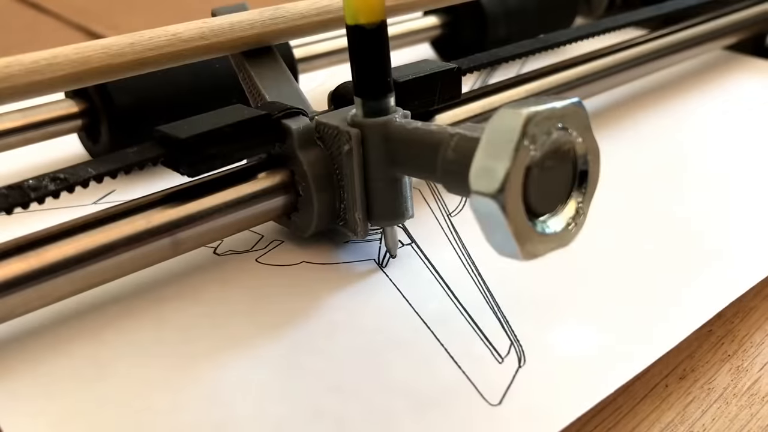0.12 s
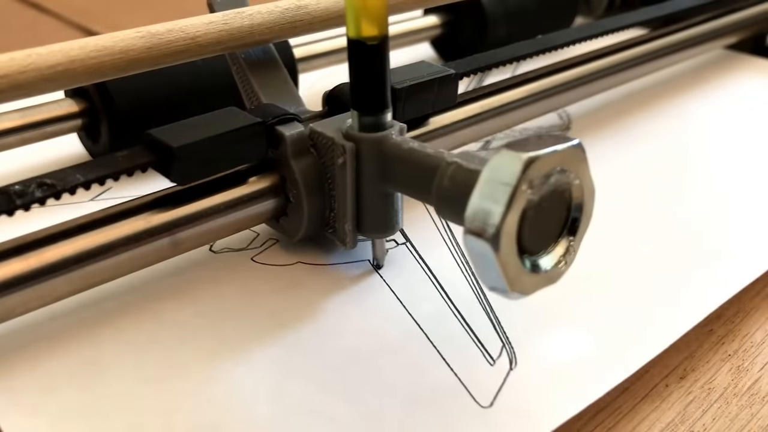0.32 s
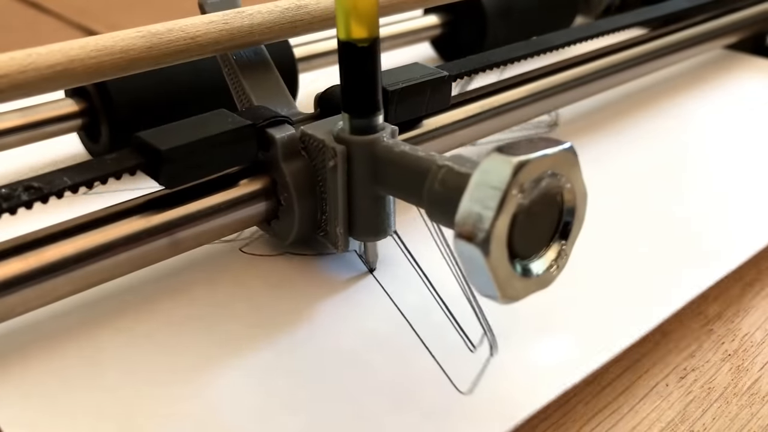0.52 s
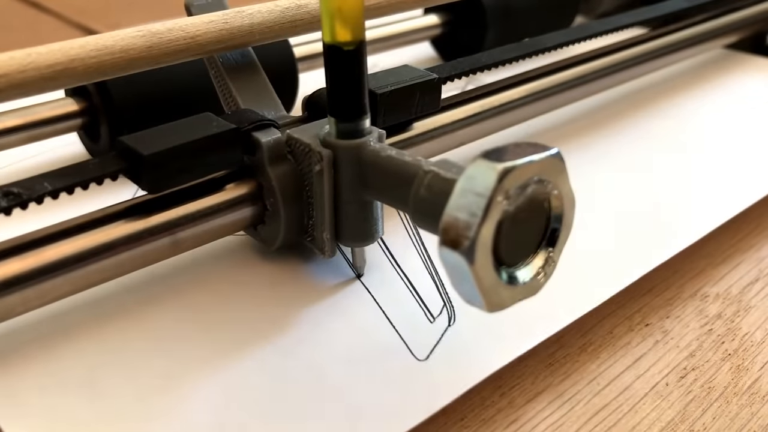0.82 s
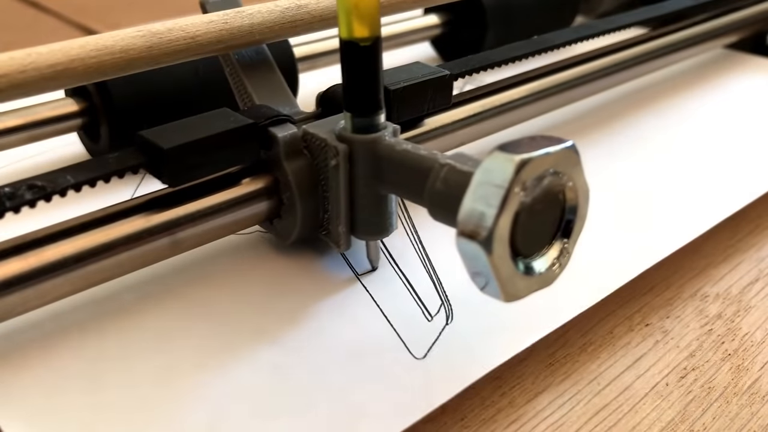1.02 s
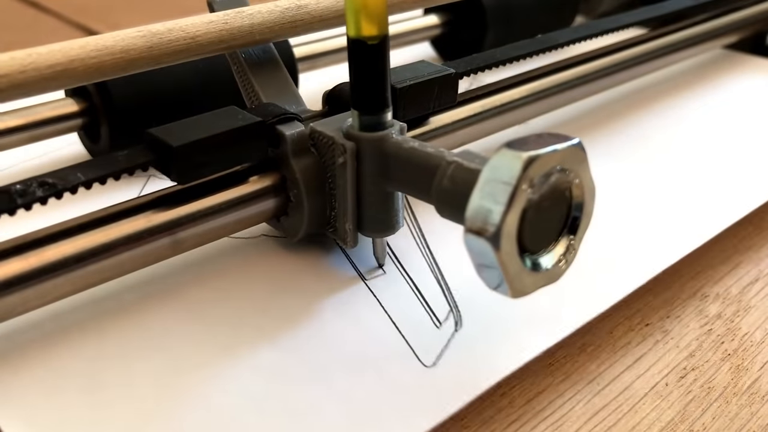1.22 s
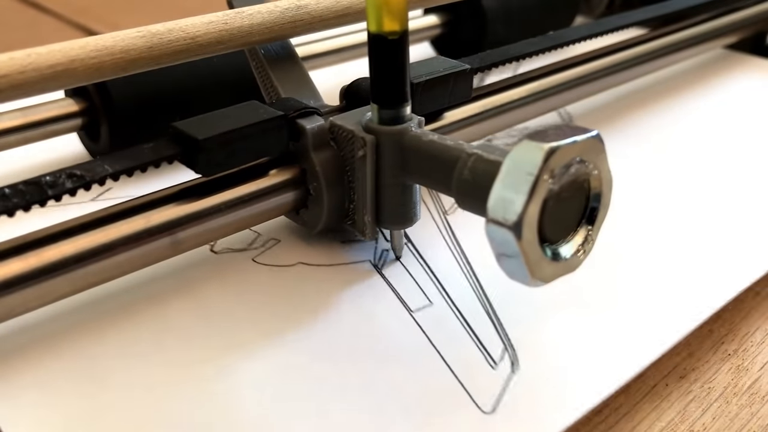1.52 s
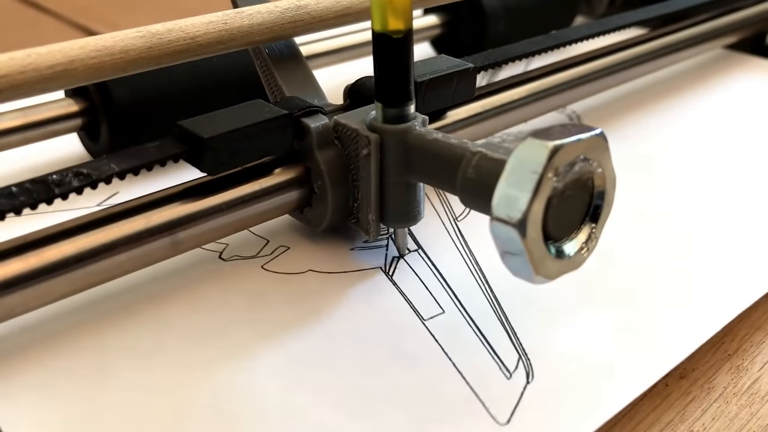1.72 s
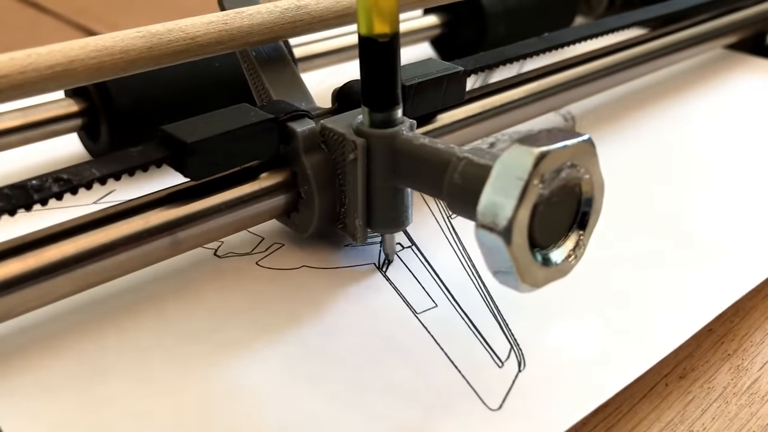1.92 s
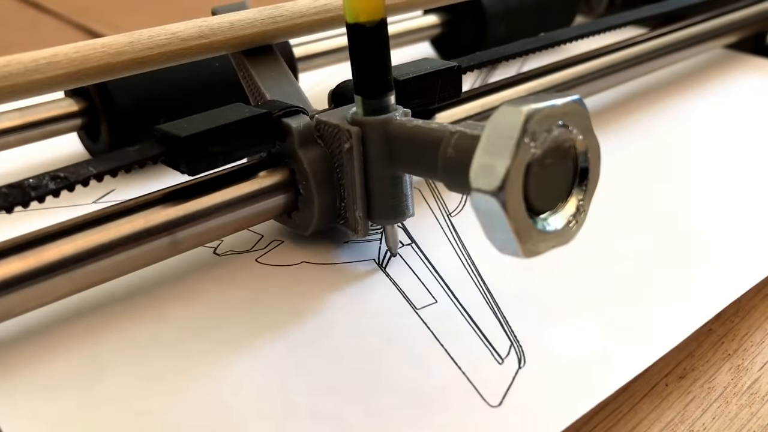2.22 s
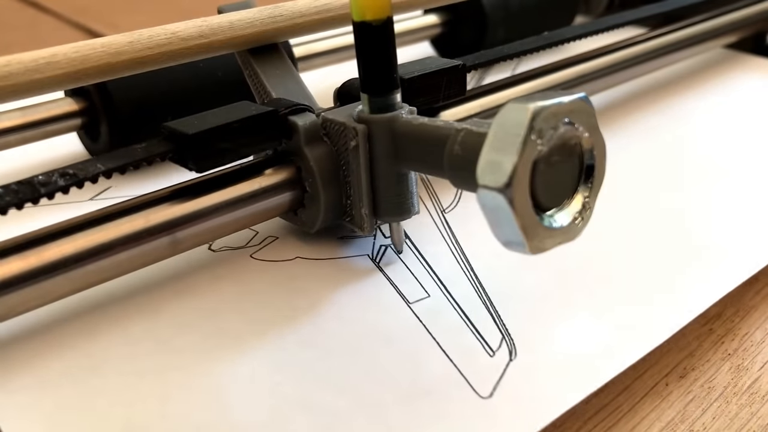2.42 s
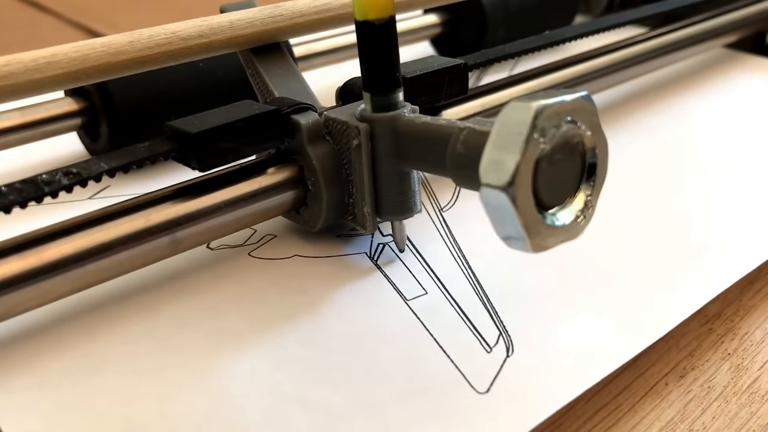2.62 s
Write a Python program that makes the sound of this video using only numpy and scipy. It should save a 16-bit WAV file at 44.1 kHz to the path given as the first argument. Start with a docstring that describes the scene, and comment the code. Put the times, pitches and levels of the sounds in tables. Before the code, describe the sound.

Two small stepper motors buzz and sing through linked rising and falling sweeps with belt rattle and hiss, framed by scratchy, squeaky pen lifts and thin resting whine; close, dry, small quiet room.

```python
"""First a thin, steady whine from resting coils in a quiet room, then a click and the rasp of a pen lift.
A pen plotter close by draws a few strokes: two stepper motors glide up and down in pitch and sing through
the frame, while belt and carriage rattle and the coil drivers hiss. The pen lift rasps and squeaks twice.
Motors are wavering tones tied to the step rate; rattle, hiss and rasp are shaped noise; clicks ring briefly."""
import sys
import numpy as np
from scipy import signal
from scipy.fft import rfft, irfft
from scipy.io import wavfile

SR = 44100
rng = np.random.default_rng(int(sys.argv[2]) if len(sys.argv) > 2 else 0)


def unload_wav(signal):
    """Save mono or channel-first audio to the path in sys.argv[1] as 16-bit WAV at rate SR, clipped to [-1, 1]."""
    wavfile.write(
        sys.argv[1],
        SR,
        np.round(np.clip(np.atleast_2d(signal).T, -1, 1) * 32767).astype(np.int16),
    )


N = 123480
T = np.arange(N) / SR
CRAWL_HZ, TOP_HZ = 149.16, 1675  # slowest and fastest step rate of the lead motor


def amp(db):
    """Decibels to gain."""
    return 10 ** (np.asarray(db) / 20)


def unit(x):
    """Scales to rms 1."""
    return x / np.sqrt(np.mean(x ** 2) + 1e-20)


def colour(x, points):
    """Filters by a curve of (pitch_hz, level_db) points."""
    f, db = np.transpose(points)
    hz = np.fft.rfftfreq(N, 1 / SR)
    curve_db = np.interp(np.log(hz + 1), np.log(f + 1), db)
    return irfft(rfft(x) * amp(curve_db), N)


def noise(points):
    """Noise of rms 1 with the given spectrum."""
    return unit(colour(rng.standard_normal(N), points))


def wander(hz):
    """Random drift of rms 1 that fades out above the given rate."""
    lowpass = 1 / (1 + (np.fft.rfftfreq(N, 1 / SR) / hz) ** 4)
    return unit(irfft(rfft(rng.standard_normal(N)) * lowpass, N))


def ring(x, modes):
    """Sum of resonances (pitch_hz, width_hz, level_db), none narrower than 5 Hz."""
    total = 0
    for hz, width, db in modes:
        b, a = signal.iirpeak(hz, hz / max(width, 5), SR)
        total = total + amp(db) * signal.lfilter(b, a, x)
    return total


def gate(start, end, edge_s=0.008):
    """On between two times, with short ramps."""
    opening = np.clip((T - start) / edge_s + .5, 0, 1)
    closing = np.clip((end - T) / edge_s + .5, 0, 1)
    return opening * closing


def bump(at, length):
    """Smooth hump of height 1."""
    return np.exp(-(2 * (T - at) / length) ** 2)


def tone(hz, clock):
    """Sine of rms 1 on a wavering clock, starting anywhere in its cycle."""
    return np.sqrt(2) * np.sin(2 * np.pi * (hz * clock + rng.random()))


def swells(rows, waver):
    """Short wavering tones that swell and fade: time_s, length_s, pitch_hz, level_db."""
    clock = np.cumsum(1 + waver * wander(156)) / SR
    return sum(amp(db) * bump(s, length) * tone(hz, clock) for s, length, hz, db in rows)


# Spectrum of the quiet room and idle electronics: pitch_hz, level_db (relative)
FLOOR = [(15, -12), (28, -3), (47, 6.5), (70, 7.5), (150, -2.5), (280, 2), (500, -11.5), (1000, -10.5),
         (2100, -21), (3200, -16.5), (7800, -22), (8650, -9), (9400, -25), (12100, -14), (16000, -23)]


def quiet_room():
    """Steady low noise of the room and idle electronics."""
    return amp(-60.5) * noise(FLOOR)


def room(x):
    """Short reflections from desk and walls; the bass lasts longer."""
    level_db, t60_s, bass_t60_s = -14.5, 0.048, 0.28
    t = T[:SR // 2]
    taps = rng.standard_normal(len(t)) * (t > .002)
    bass = signal.sosfilt(signal.butter(2, 350, fs=SR, output="sos"), taps)
    tail = (taps - bass) * amp(-60 * t / t60_s) + bass * amp(-60 * t / bass_t60_s)
    return amp(level_db) * signal.fftconvolve(x, tail / np.linalg.norm(tail))[:N]


# Coil whine at rest (A, B) and two brief ringing chords under way (C, D): pitch_hz, level_db
WHINE_A = [(2767, -63), (2961, -71.5), (5922, -80), (7607, -81), (8549, -99), (8882, -81), (10858, -79),
           (11843, -73), (12828, -78), (13819, -86)]
WHINE_B = [(1567, -66), (3128, -69), (8554, -93), (10955, -79), (12129, -82), (12522, -75), (13695, -80)]
WHINE_C = [(2234, -42.5), (5179, -49), (6105, -50.5), (7251, -51), (8861, -55), (9545, -50), (11660, -57)]
WHINE_D = [(1077, -46.5), (2223, -53), (4737, -44), (6013, -47), (6584, -46), (8613, -49), (9620, -52),
           (10885, -52), (11143, -46), (14077, -66)]
# When each chord sounds: start_s, end_s, chord (its pitch_hz, level_db rows)
WHINES = [(-.01, 0.19, WHINE_A), (0.259, 0.28, WHINE_D), (1.374, 1.385, WHINE_C), (1.998, 2.342, WHINE_A),
          (2.544, 2.81, WHINE_B)]


def whine():
    """Coils that hold still sing on nearly steady pitches; two brief chords ring under way."""
    clock = np.cumsum(1 + 0.00046 * wander(76)) / SR
    total = 0
    for start, end, lines in WHINES:
        chord = sum(amp(db) * tone(hz, clock) for hz, db in lines)
        total = total + gate(start, end) * chord
    return total


# Clicks of the carriage: time_s, peak_db
CLICKS = [(.1927, -32), (.8785, -24), (2.0616, -36)]
# What each click rings: pitch_hz, width_hz, level_db (relative)
CLICK = [(3300, 600, 0), (5300, 700, -1), (7600, 1200, -8), (12000, 4000, -18)]


def clicks():
    """Sharp ticks of play in the carriage, each ringing a few short modes."""
    total = 0
    for s, db in CLICKS:
        impulse = 1. * (np.arange(N) == round(s * SR))
        tick = ring(impulse, CLICK)
        total = total + amp(db) * tick / abs(tick).max()
    return total


# Short squeaks of the pen lift: time_s, length_s, pitch_hz, level_db
SQUEAKS = [(.224, 0.013, 4220, -43.5), (.245, 0.0081, 4480, -35), (.238, 0.021, 3434, -46),
           (2.069, 0.0077, 6600, -39.5), (2.093, .008, 3400, -46), (2.115, 0.011, 6820, -40.5),
           (2.13, 0.0079, 6460, -38.5), (2.13, 0.013, 3374, -44)]


def squeaks():
    """Brief wavering tones squeaked by the pen lift."""
    return swells(SQUEAKS, 0.009)


# Two pen lifts, each a list of rows: time_s, rasp_db (before grain and mix), thump_db
LIFTS = [
    [(.192, -47, -76), (.2, -48, -67), (.207, -38.5, -52), (.228, -38, -47.5), (.244, -39.5, -37),
     (.262, -39, -43), (.274, -45, -56), (.285, -45, -47.5), (.296, -50, -46)],
    [(2.061, -53, -67), (2.069, -41.5, -72), (2.079, -47.5, -49), (2.094, -39.5, -54), (2.102, -38.5, -52),
     (2.115, -38.5, -39), (2.131, -39, -47.5), (2.142, -41, -48.5), (2.16, -45.5, -57), (2.172, -56, -54)],
]
# Spectrum of the rasp: pitch_hz, level_db (relative)
RASP = [(710, -49), (1200, -30), (1630, -10), (1810, -28.5), (2270, 1.5), (2480, -23), (3050, -12.5),
        (3430, -10.5), (3790, -24.5), (4170, -2.5), (5530, -3.5), (6720, -4), (7660, -4), (14800, -7.5),
        (16000, -53.5)]
# Spectrum of the thump: pitch_hz, level_db (relative)
THUMP = [(50, -17), (150, -13.5), (250, 5), (400, -8.5), (800, -4), (1200, -13.5), (1550, -1.5),
         (2200, -18.5), (4000, -21)]
# Metal that the rasp rings: pitch_hz, width_hz, level_db (relative)
LIFT_MODES = [(3490, 59, 1), (4230, 630, -13.5), (6090, 34, 3), (6740, 170, 3), (9000, 46, 1),
              (9790, 11, 12), (11700, 120, 0.5), (13900, 92, 4.5), (14600, 36, 4)]


def lift_gain(column):
    """Loudness of one part of both lifts, silent outside them."""
    total = 0
    for rows in LIFTS:
        table = np.array(rows)
        total = total + amp(np.interp(T, table[:, 0], table[:, column], -np.inf, -np.inf))
    return total


def pen_lift():
    """A short fast move: a grainy rasp that rings the metal, and a thump of the holder."""
    grain = unit(np.exp(0.15 * wander(503)))
    metal = unit(ring(rng.standard_normal(N), LIFT_MODES))
    rasp = lift_gain(1) * grain * (amp(0.5) * noise(RASP) + amp(-1) * metal)
    thump = lift_gain(2) * noise(THUMP)
    return rasp, thump


# Spectrum of the driver hiss: pitch_hz, level_db (relative)
HISS = [(2060, -22), (3500, -2.5), (3660, -2.5), (4810, -6.5), (5220, -4), (7000, -4), (7900, -8),
        (8580, -1), (10400, -10.5), (12100, -4), (16000, -13)]


def hiss(rate, moving):
    """The coil drivers hiss in time with the steps, louder at speed."""
    base_db, rise_db_per_khz = -57, 4.5
    # one swell per four steps, plus random flicker
    beat = 1 + 0.1 * np.sin(np.pi * np.cumsum(rate / 2) / SR) + 0.31 * wander(167)
    return noise(HISS) * beat * moving * amp(base_db + rise_db_per_khz * rate / 1e3)


# Spectrum of the belt and carriage rattle: pitch_hz, level_db (relative)
RATTLE = [(40, -12), (100, -6.5), (160, 9.5), (210, -2), (265, 4.5), (340, -7), (600, -2.5), (1050, 1),
          (1350, -7), (1900, -12.5), (2600, -4), (3600, -22), (6000, -45), (16000, -55)]
# How the rattle rises and falls: time_s, level_db (relative)
RATTLE_LEVEL = [(.25, -1), (.4, -0.5), (.5, 1.5), (.65, -0.5), (.78, 0), (.86, 4.5), (.93, -0.5),
                (1.04, 1.5), (1.1, -1), (1.125, -1), (1.16, 3), (1.3, 0), (1.45, 1), (1.6, 1.5),
                (1.68, 1.5), (1.73, 6), (1.77, 0.5), (1.9, -1), (2.0, 3.5), (2.35, 0.5), (2.4, 1), (2.5, 2),
                (2.55, 2.5)]
# Frame tones rung by the knocks: pitch_hz, width_hz, level_db (relative)
RATTLE_MODES = [(1007, 77, -1), (1594, 57, -2.5), (2794, 95, -11)]
# When a loose part buzzes: time_s, length_s, level_db
BUZZES = [(.25, .012, -44), (0.317, 0.066, -51), (0.393, 0.061, -49), (0.453, 0.056, -45.5),
          (1.31, 0.037, -43.5), (1.578, 0.019, -48), (1.692, .025, -45), (1.745, 0.054, -50.5),
          (1.859, 0.033, -49), (1.916, 0.081, -50.5), (1.976, 0.032, -50.5), (2.357, 0.009, -48.5),
          (2.409, 0.023, -46), (2.443, 0.04, -49), (2.504, 0.031, -52)]
# Spectrum of that buzz: pitch_hz, level_db (relative)
BUZZ = [(300, -30), (1700, -43), (2300, -8.5), (2750, -3.5), (3100, -17.5), (3800, -14), (8000, -74),
        (16000, -55)]


def rattle(rate, moving):
    """Belt and carriage chatter once per coil cycle, ring the frame, and run smoother at speed."""
    base_db, fast_db, knock_db = -48, -2.5, -5
    best_hz, pulse = 840, 0.43  # step rate above which it smooths out; share of chatter in pulses
    cycle = np.cumsum(rate / 4) / SR % 1  # four full steps per coil cycle
    chatter = unit(1 - pulse + pulse * unit(np.exp(-cycle / .2)))
    fast = np.clip((rate - best_hz) / (TOP_HZ - best_hz), 0, 1)
    level = moving * amp(base_db + fast_db * fast + np.interp(T, *np.transpose(RATTLE_LEVEL)))
    # one knock of random strength at the start of each cycle
    knocks = (np.diff(cycle, prepend=0) < 0) * rng.uniform(-0.68, 1, N) * np.sqrt(rate / TOP_HZ)
    ringing = amp(knock_db) * unit(ring(knocks, RATTLE_MODES)) * (1 - fast)
    body = unit(colour(chatter * rng.standard_normal(N), RATTLE)) + ringing
    buzz = unit(colour(chatter * rng.standard_normal(N), BUZZ))
    loose = buzz * sum(amp(db) * bump(s, length) for s, length, db in BUZZES)
    return body * level + loose


# Shudders of the frame, and one knock as the carriage turns around (1.122 s): time_s, length_s, pitch_hz,
# level_db
SHUDDERS = [(.27, .03, 170, -43.5), (.578, 0.038, 137, -40), (.765, 0.023, 148, -39.5),
            (1.032, 0.032, 174, -41.5), (1.32, 0.052, 158, -42), (1.6, 0.044, 142.5, -42),
            (1.79, 0.058, 159.6, -41.5), (2.0, .04, 162, -44), (1.122, .016, 485.6, -43),
            (2.375, 0.016, 257, -45), (2.575, 0.038, 154.2, -48.5)]


def shudders():
    """The frame shudders as a ramp passes through its resonance, and knocks once where the carriage turns
    around; the table sets when."""
    return swells(SHUDDERS, 0.026)


# Strokes: start_s, fastest_s, end_s, apex_hz (before the speed limits), ramp_hz_per_s,
# second_motor_share (of the lead's step rate), lead_db, second_db (both relative)
MOVES = [(.27, .353, .435, 1150, 7400, .55, 0, 0), (.435, .648, .92, 1780, 6300, .39, 0, -4),
         (.92, 1.017, 1.125, 1330, 8400, .52, -5, -11), (1.125, 1.44, 1.765, 2070, 6200, .44, 0, -3),
         (1.765, 1.883, 2.003, 1130, 7700, .5, -1, -1), (2.339, 2.443, 2.553, 755, 5400, .82, 2.5, -6)]


def motion():
    """Step rates and gains of both motors: constant acceleration up to a speed limit."""
    full_voice_hz = 510  # both motors are quieter while the lead steps slower than this
    rates = np.full((2, N), float(CRAWL_HZ))
    gains, moving = np.zeros((2, N)), np.zeros(N)
    for start, mid, end, apex, ramp, share, lead_db, second_db in MOVES:
        span = (T >= start) & (T < end)
        on = gate(start, end)
        lead = np.clip(apex - ramp * abs(T[span] - mid), CRAWL_HZ, TOP_HZ)
        rates[:, span] = np.outer([1, share], lead)
        gains = np.maximum(gains, np.outer(amp([lead_db, second_db]), on))
        moving = np.maximum(moving, on)
    return rates, gains * np.minimum(rates[0] / full_voice_hz, 1), moving


# Motor tones, as multiples of the full-step rate: multiple (no unit)
MULTIPLES = [.25, .5, .75, 1, 1.25, 1.5, 1.75, 2, 2.5, 3, 4]
# Loudness of each of those tones: level_db (relative)
PARTIAL_DB = [-16, -20, -19, 0, -22, -20, -21, -13, -23, -27, -30]
# How well the frame radiates: pitch_hz, level_db (relative)
FRAME = [(40, -37), (110, -7.5), (160, -8), (210, 3.5), (270, 1), (350, -2.5), (550, 0), (750, 1),
         (1050, 8), (1350, -2), (1700, 1), (2600, 5), (3400, 7.5), (5000, 14), (12000, -13)]
# Low frame resonances: pitch_hz, width_hz, level_db (relative)
BOOM = [(158, 25.5, 2.5), (269, 13, -6.5)]


def motor(rate, gain, speed):
    """Torque ripple at the step rate, its quarters and harmonics shakes the frame; slow running is rough."""
    rough = np.interp(speed, [700, TOP_HZ], [.42, .1])
    jitter_hz = .003 * TOP_HZ * wander(85.6)
    turns = np.cumsum(rate + jitter_hz) / SR
    ripple = 0
    for k, db in zip(MULTIPLES, PARTIAL_DB):
        depth = rough * max(k, 1)
        # random flutter of both loudness and phase, at even power
        flutter = 1 + depth * (wander(70) + 1j * wander(70))
        flutter = flutter / np.sqrt(1 + 2 * depth ** 2)
        partial = flutter * np.exp(2j * np.pi * (k * turns + rng.random()))
        ripple = ripple + amp(db) * partial.real
    drive = np.sqrt(2) * amp(-48) * gain * ripple
    return colour(drive, FRAME) + ring(drive, BOOM)


# Brief changes of the treble, mostly dips: time_s, length_s, change_db
DIPS = [(0.269, 0.0067, -17), (.402, 0.0049, -10), (0.809, 0.04, -6), (.846, 0.03, -6), (0.91, 0.021, -7.5),
        (1.058, .01, -8), (1.124, 0.025, -12), (1.379, 0.024, 1), (1.767, 0.006, 1), (1.99, .03, -2.5),
        (2.553, 0.009, -7)]


def treble_dips(machine):
    """The treble dips briefly here and there, or lifts slightly; the low part stays as it is."""
    edge_hz = 1930
    change = amp(sum(db * gate(s - length / 2, s + length / 2) for s, length, db in DIPS))
    low = colour(machine, [(edge_hz / 2, 0), (edge_hz, 0), (2 * edge_hz, -40)])
    return low + (machine - low) * change


def scene():
    """The whole machine in a quiet room."""
    rates, gains, moving = motion()
    rasp, thump = pen_lift()
    motors = sum(motor(rate, gain, rates[0]) for rate, gain in zip(rates, gains))
    frame = motors + rattle(rates[0], moving) + shudders() + thump
    treble = hiss(rates[0], moving) + rasp + squeaks()
    machine = frame + treble + room(frame + amp(3.5) * treble)  # the room gets extra treble
    return (treble_dips(machine) + clicks() + whine() + quiet_room())[None]


def record(dry):
    """Cuts the sound off above about 16 kHz."""
    lowpass = signal.firwin(511, 16100, window=("kaiser", 9), fs=SR)
    return signal.oaconvolve(dry, lowpass[None], "same")


dry = scene()
out = record(dry)
unload_wav(out)
```